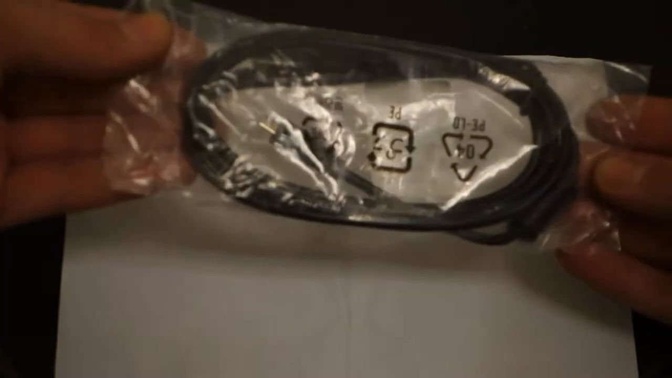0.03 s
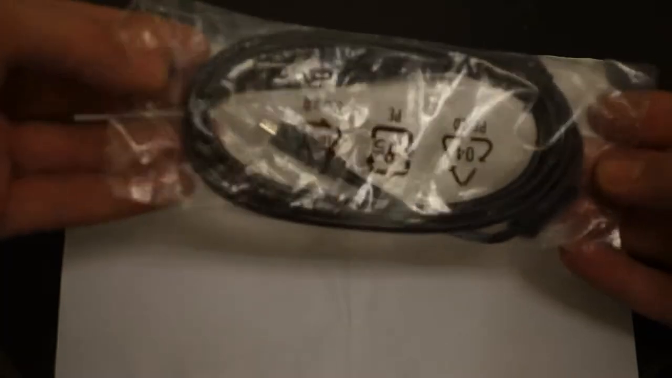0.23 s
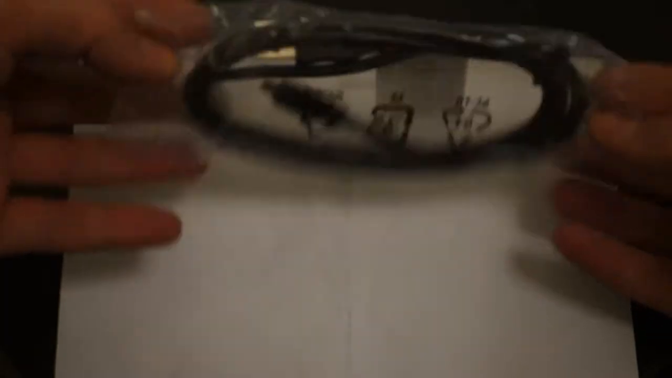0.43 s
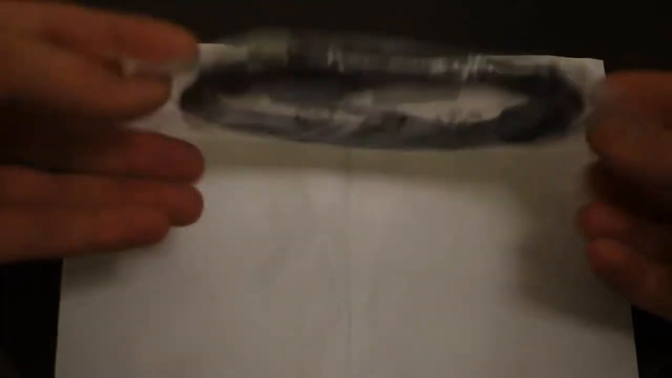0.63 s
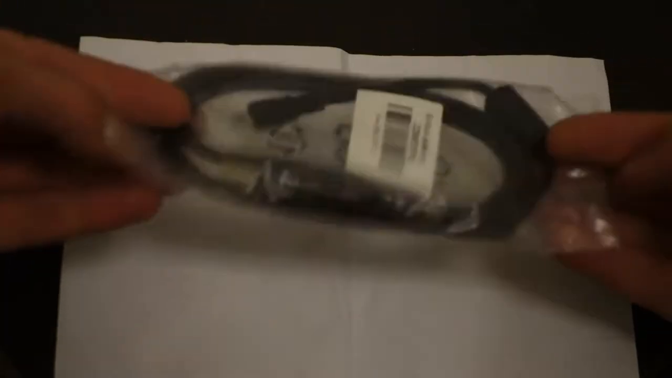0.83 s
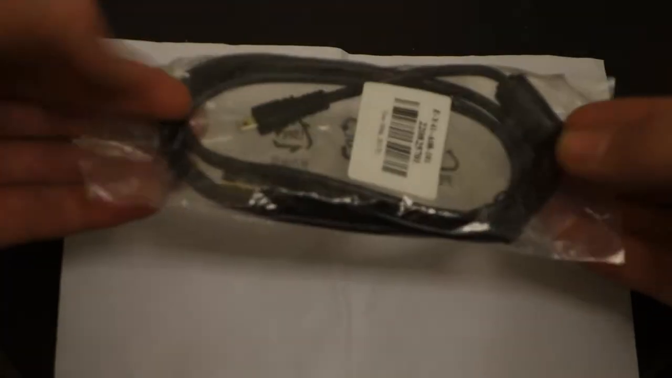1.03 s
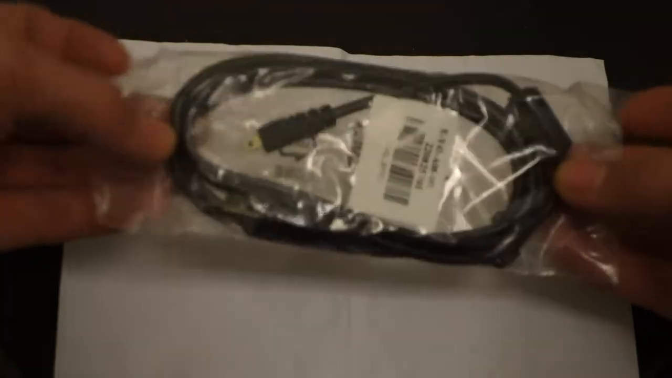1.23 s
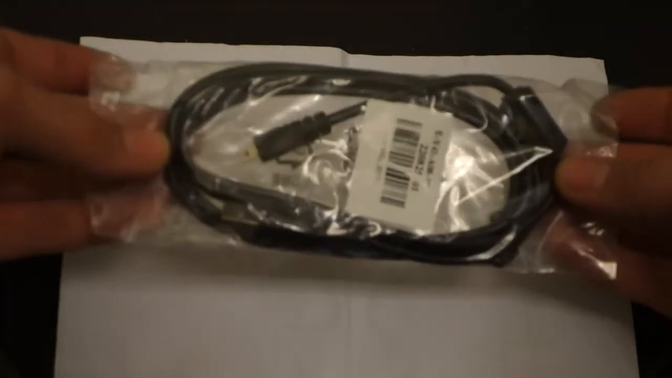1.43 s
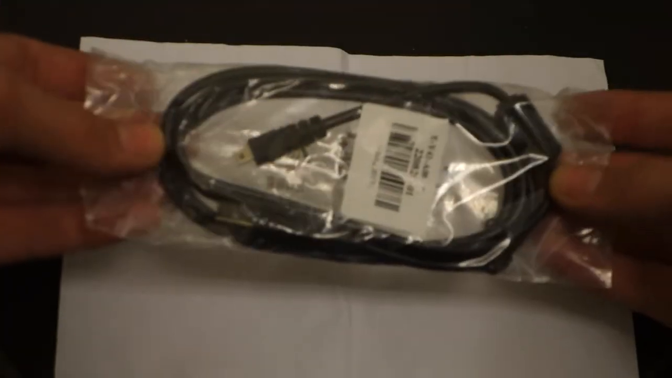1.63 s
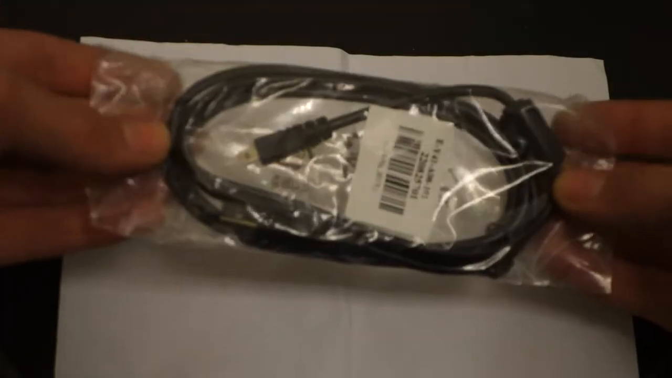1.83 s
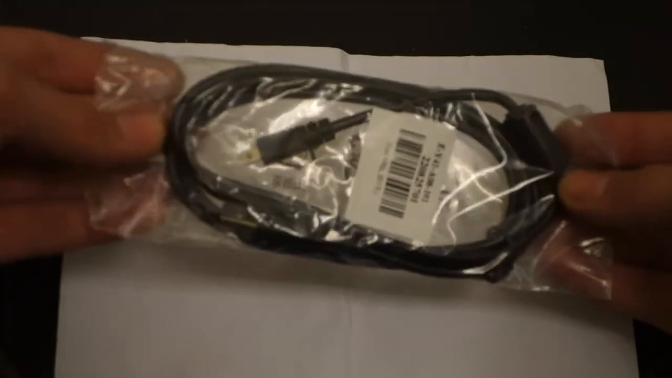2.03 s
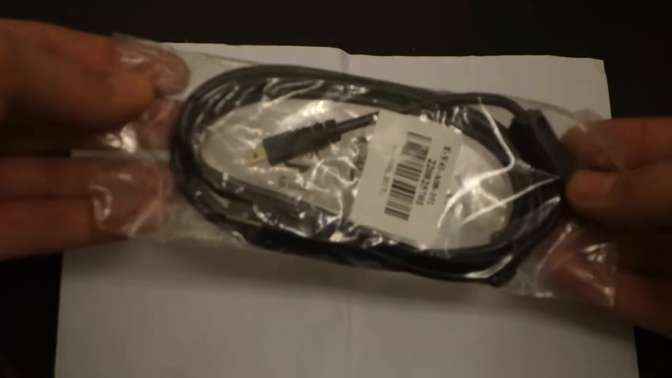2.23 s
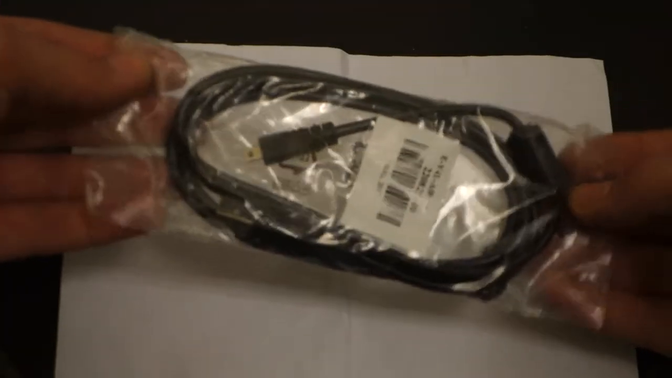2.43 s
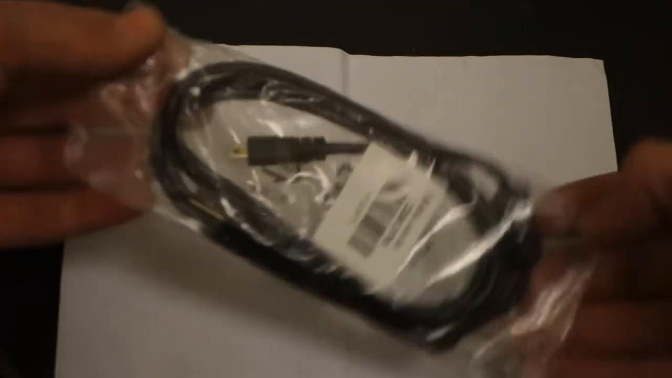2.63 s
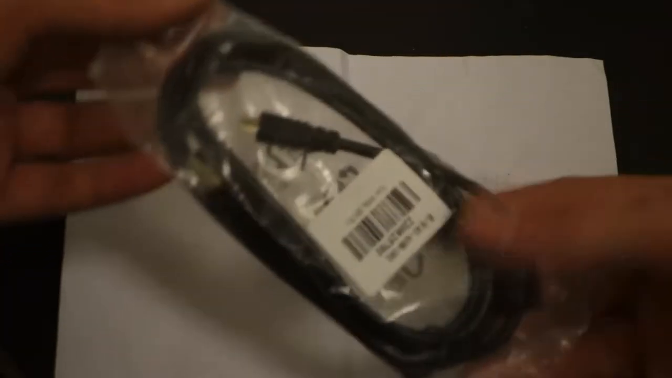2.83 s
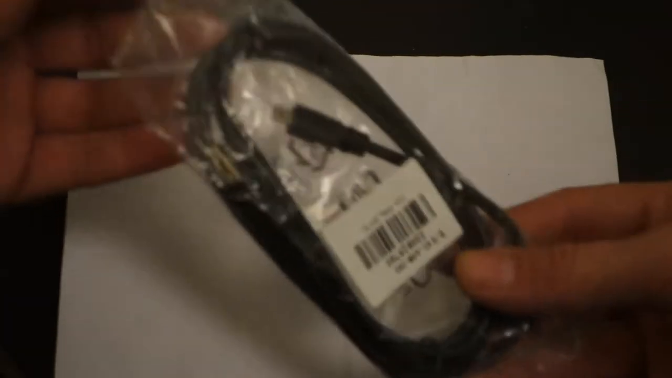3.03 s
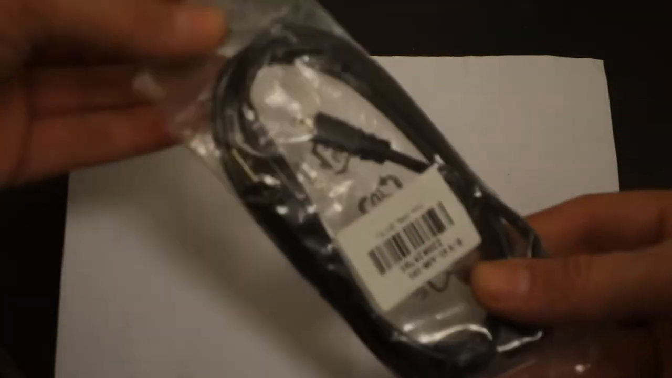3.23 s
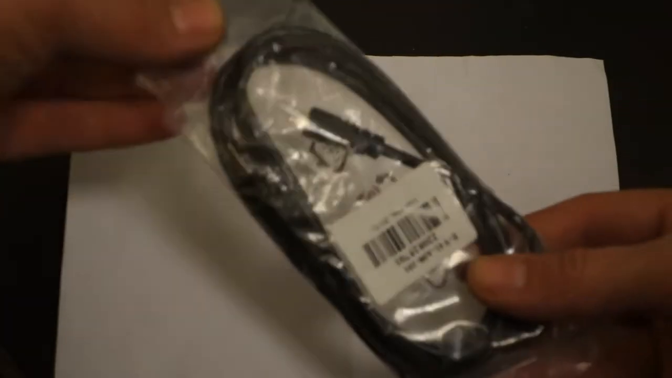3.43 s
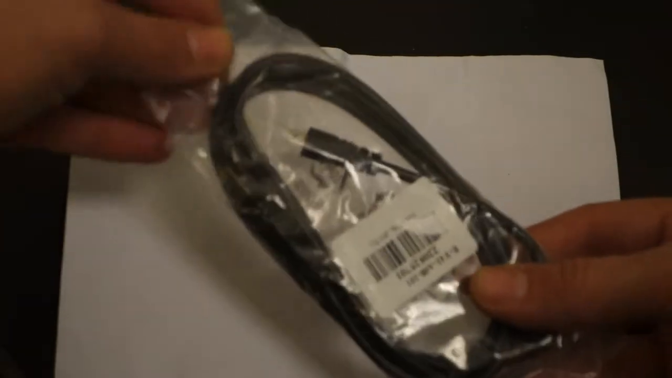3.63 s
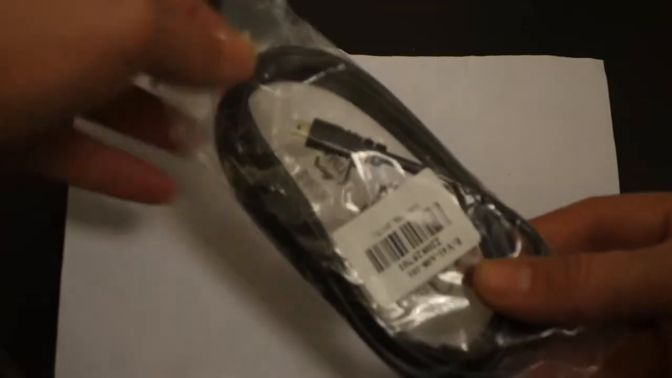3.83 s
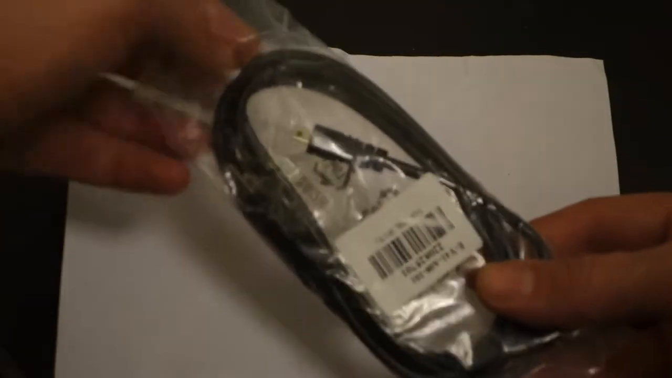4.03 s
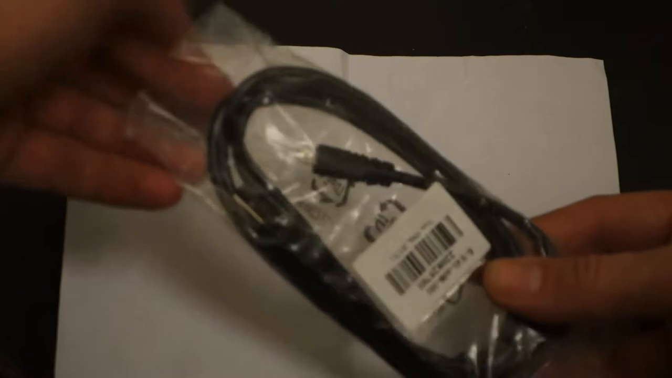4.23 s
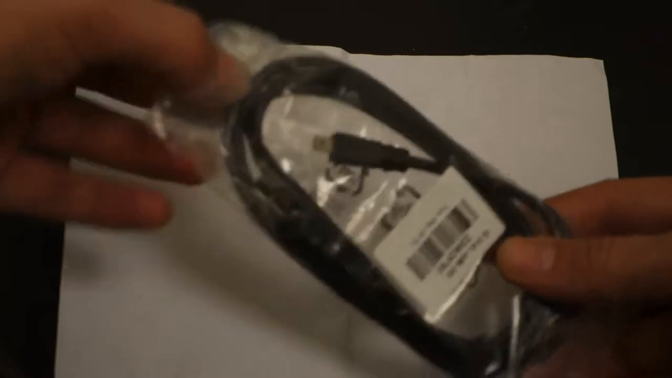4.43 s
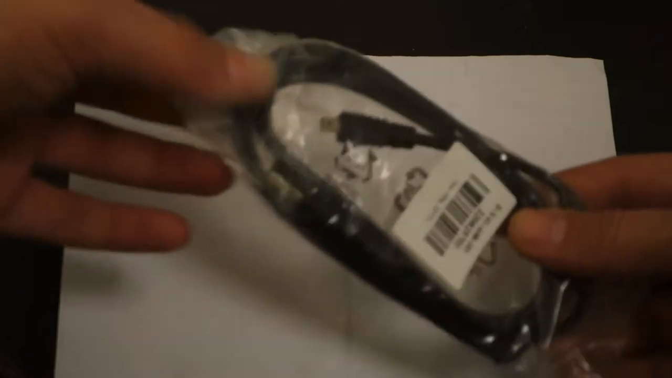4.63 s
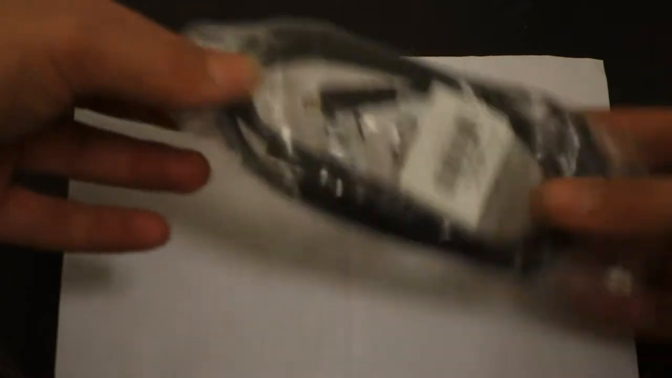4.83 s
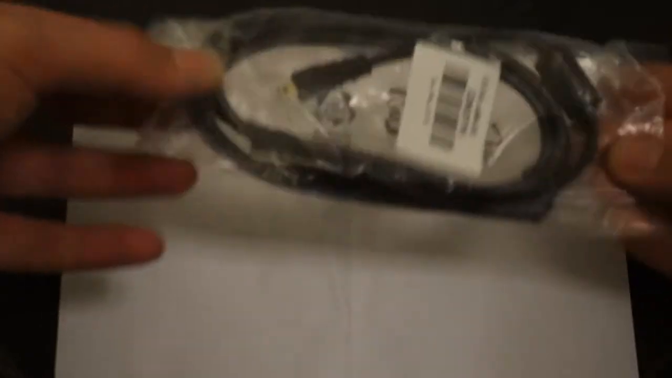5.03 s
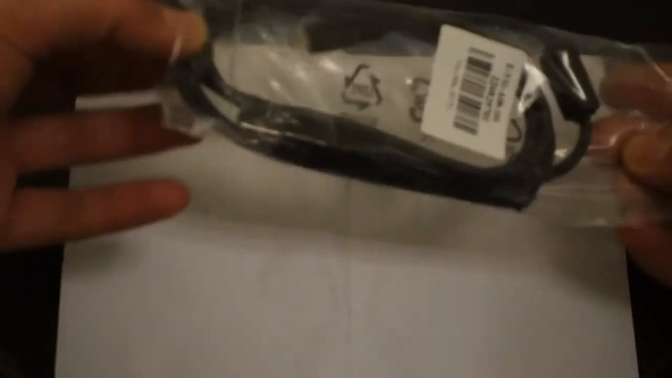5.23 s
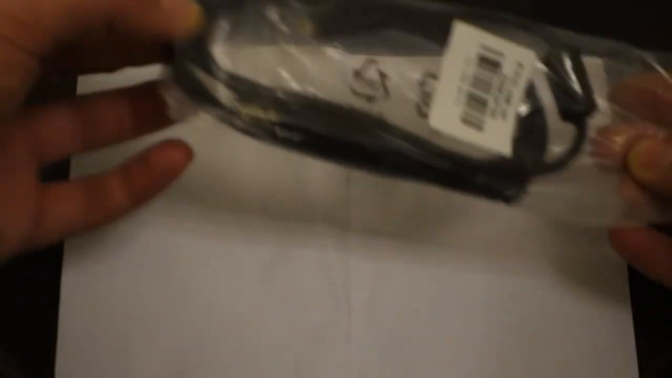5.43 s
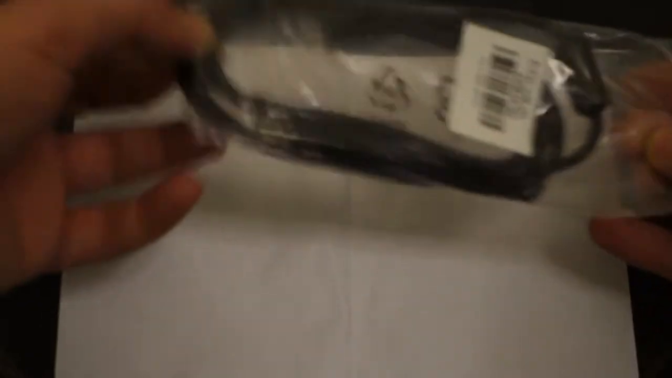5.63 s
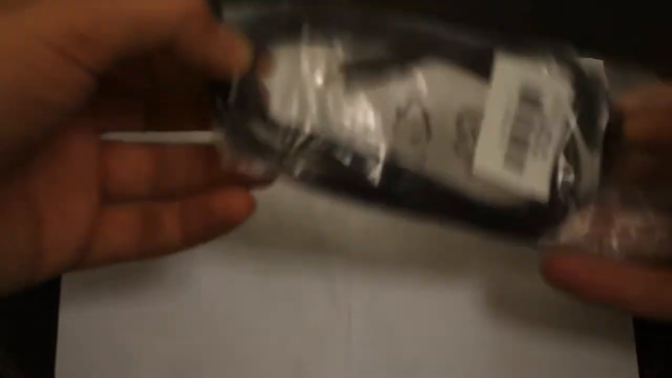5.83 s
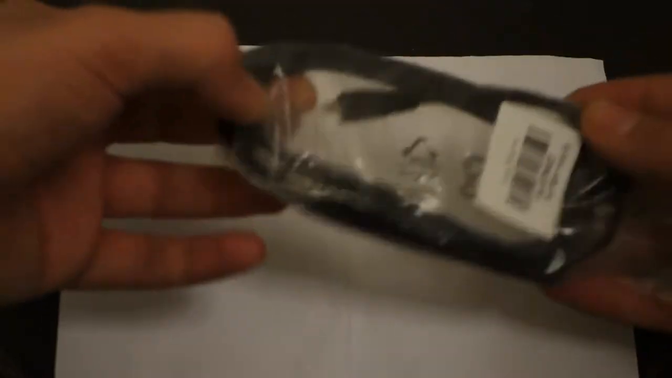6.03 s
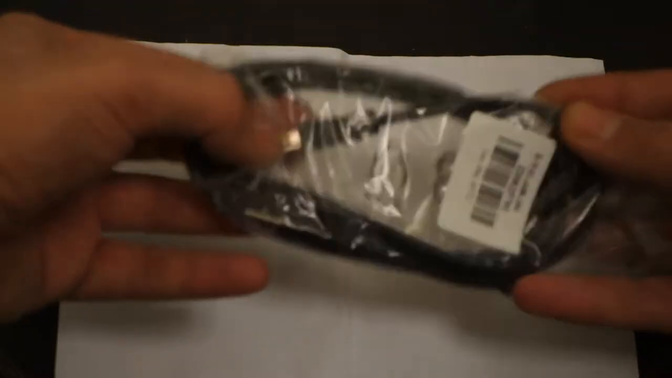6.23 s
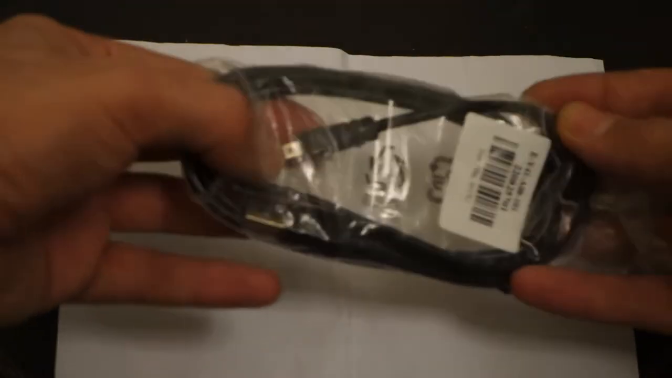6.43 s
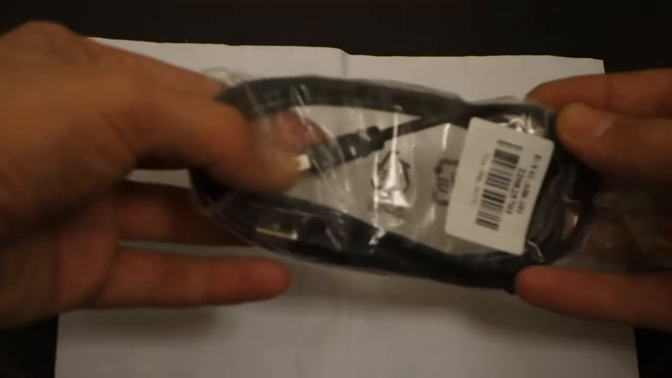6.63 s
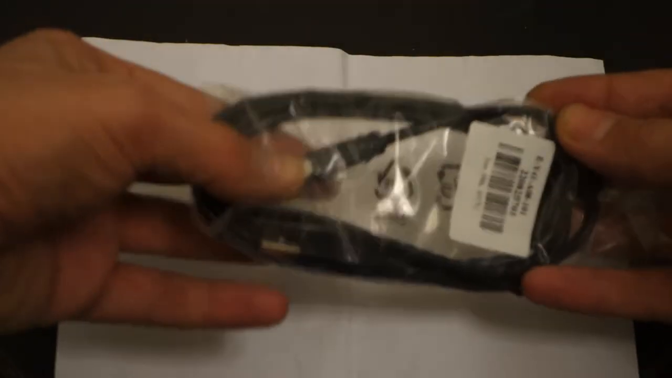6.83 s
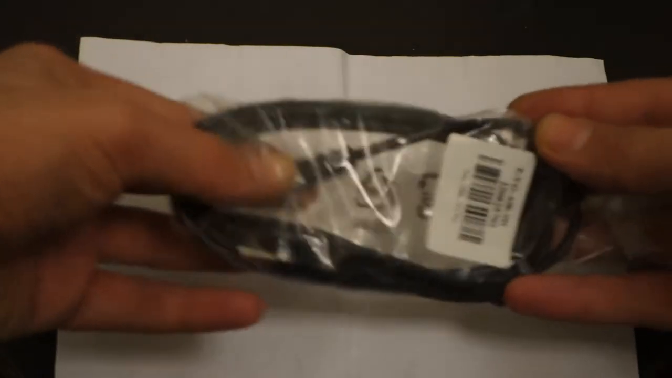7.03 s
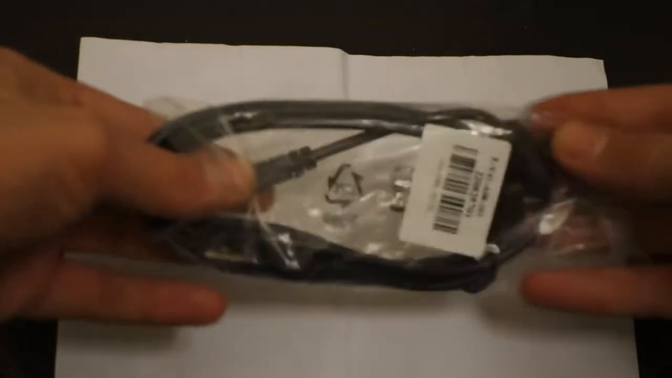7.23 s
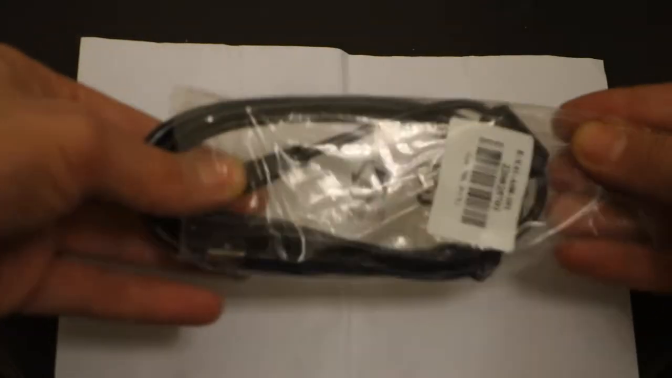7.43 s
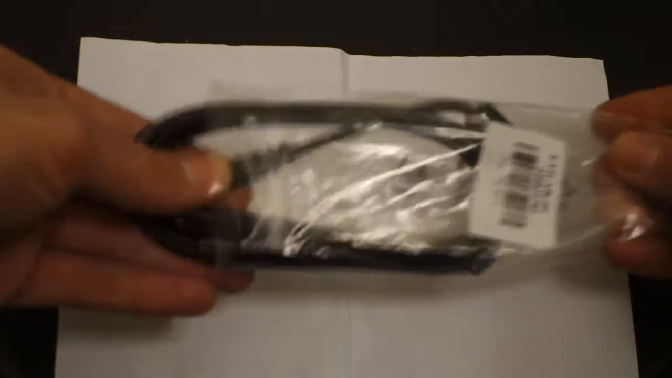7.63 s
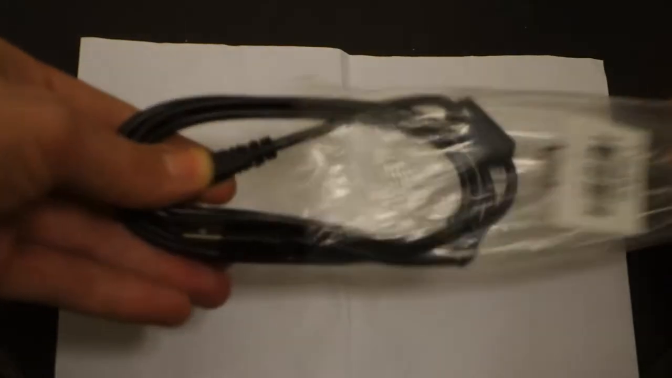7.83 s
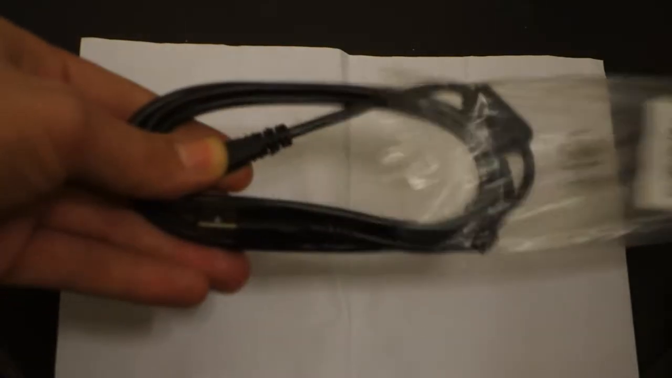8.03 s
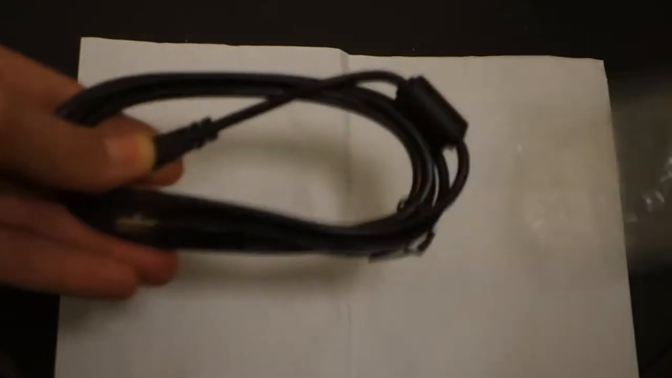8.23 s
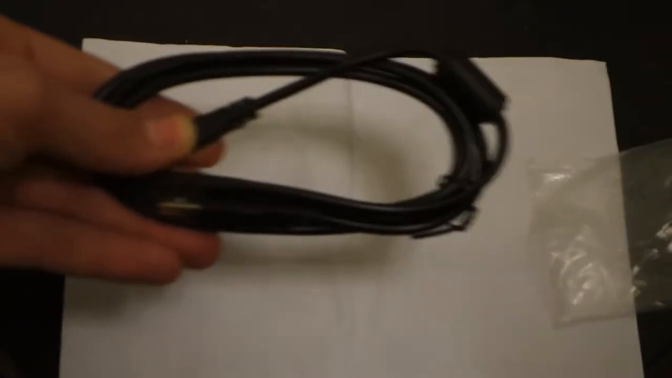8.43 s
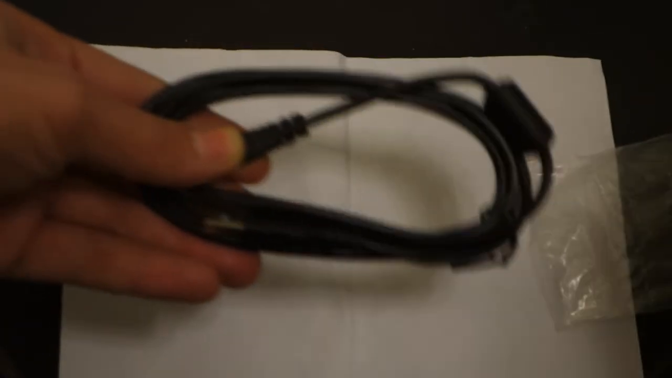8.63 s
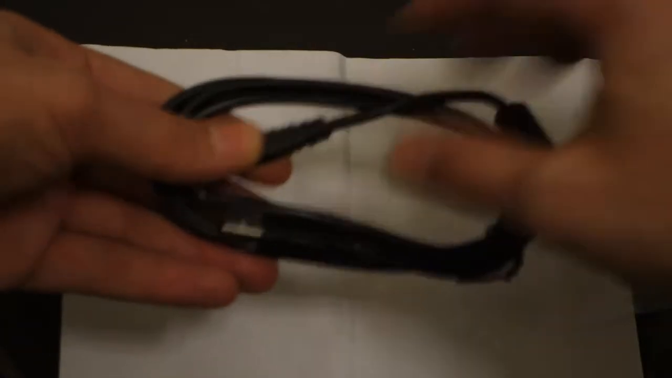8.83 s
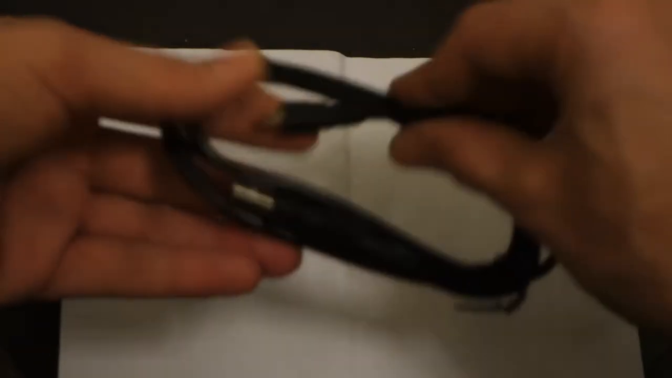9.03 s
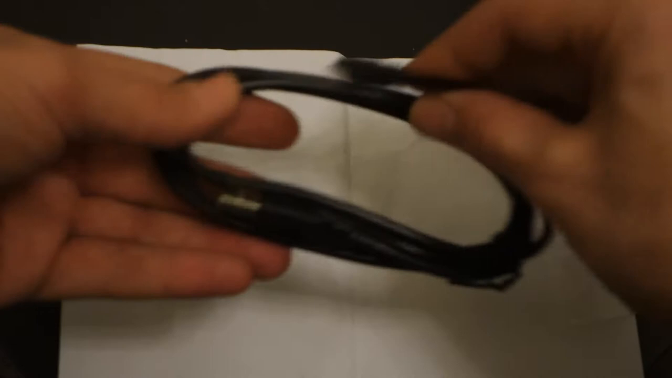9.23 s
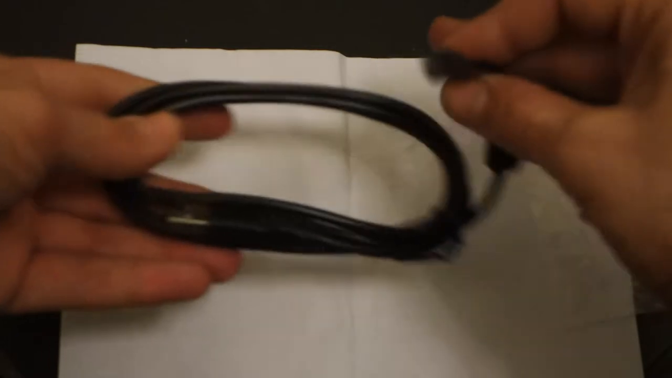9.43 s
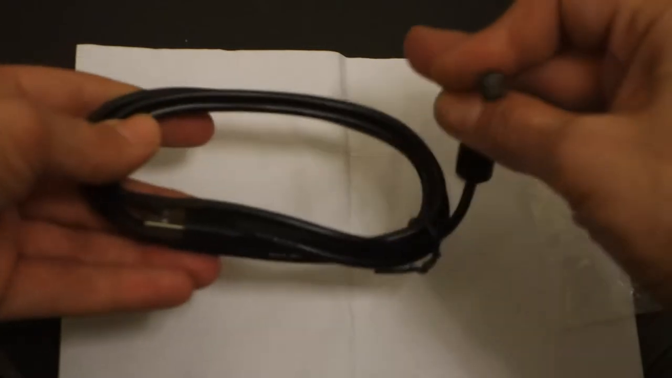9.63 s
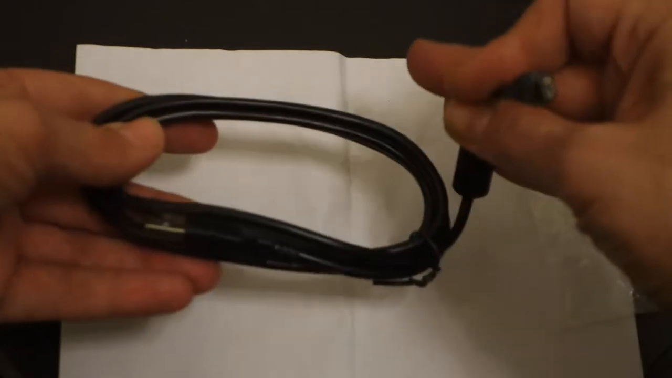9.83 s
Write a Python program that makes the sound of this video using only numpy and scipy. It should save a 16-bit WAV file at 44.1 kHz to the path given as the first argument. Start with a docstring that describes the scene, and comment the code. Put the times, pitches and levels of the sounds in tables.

```python
"""In a small room, hands turn a thin plastic bag close to a stereo microphone, open it and pull a cable out.
Single creases snap as sharp steps with a shiver, over a crackle of many small ones and hissing strokes of film.
Decaying noise tails make the room's echo of the bag. The cable rubs as a low, fuzzy tone and
squeaks as short gliding tones. Shaped noise makes a quiet hush; a very narrow noise makes a faint whine."""
import sys
import numpy as np
from scipy import signal
from scipy.fft import rfft, irfft
from scipy.io import wavfile
from scipy.ndimage import uniform_filter1d

SR = 44100
rng = np.random.default_rng(int(sys.argv[2]) if len(sys.argv) > 2 else 0)


def wav_record(signal):
    """Record a signal, one row per channel, as 16-bit PCM in the file named by sys.argv[1]."""
    frames = np.transpose(np.atleast_2d(signal))
    bounded = np.clip(frames, -1, 1)
    # unit amplitude maps onto the largest positive 16-bit level
    quanta = np.round(bounded * 32767).astype(np.int16)
    wavfile.write(sys.argv[1], SR, quanta)


def volts_from_db(level):
    """Convert decibel levels to linear amplitude ratios."""
    exponent = np.asarray(level, float) / 20
    return 10 ** exponent


N = 436590  # length of the scene in samples

SIZE = 2048  # samples in the sound of one crease
HZ = np.fft.rfftfreq(SIZE, 1 / SR)
LEAD = 128  # samples of soft lead-in before the step
HELD_HZ = 5000  # centre of the crackle while the bag is merely held

# creases that snap: (step_s, crack_peak_db, crack_centre_hz, thud_peak_db, left_over_right_db)
SNAPS = [(0.023, -47, 2690, -69, -1.0), (0.1339, -41, 9900, -74, -2.0), (0.2537, -26, 10000, -58, 0.0),
         (0.2648, -26, 5610, -46, -1.0), (0.2738, -22.5, 5740, -59, -2), (0.288, -24, 5800, -61, -2.5),
         (0.31, -20.5, 4710, -64, -3), (0.343, -17.5, 5090, -54, -1), (0.3607, -19, 3640, -51, -2.5),
         (0.4031, -30.5, 4220, -50, -4), (0.4664, -36, 4890, -64, -1.5), (0.5229, -37, 3100, -59, -6),
         (0.5618, -30.5, 2990, -53, -3), (0.5734, -29.5, 4550, -47, 0), (0.5932, -29, 5750, -47, -9),
         (0.6797, -34.5, 6520, -46, -7), (0.6867, -22, 6140, -44, -0.5), (0.7138, -19, 6600, -59.5, -3),
         (0.7637, -16, 4570, -47, -2.5), (0.7682, -8.5, 9400, -41, 3), (0.816, -20, 5080, -53, -1.5),
         (0.8238, -18, 5700, -36, -0.5), (0.857, -17, 5700, -32, -3), (0.8815, -14, 10200, -40, -3.0),
         (0.8948, -19.5, 2970, -39, -2.5), (0.9404, -43, 4140, -56, -0.5), (0.9798, -23.5, 3700, -54, -3),
         (1.0023, -22, 8340, -50, -0.5), (1.045, -22.5, 10200, -64, -0.5), (1.0802, -18, 5240, -55, 1),
         (1.2201, -16.5, 5060, -51, 0), (1.271, -30, 7370, -44, 0.0), (1.335, -24.5, 10250, -63, -2),
         (1.3554, -27.5, 4700, -58, 0), (1.4092, -34.5, 9660, -43, -1.0), (1.4961, -27, 3500, -40.5, -1),
         (1.7515, -32, 4950, -48, -5), (1.767, -30, 8400, -43.5, -5), (1.8713, -23.5, 4700, -30.5, -3.5),
         (1.8986, -30, 4830, -36, -3.0), (1.9685, -26, 2330, -36.5, -1), (2.1387, -18.5, 5900, -42.5, -2.5),
         (2.2346, -19.5, 7800, -54, -1), (2.2656, -30, 4520, -49, -2.5), (2.282, -31, 6250, -43, -2.0),
         (2.2937, -35, 5670, -43, -1.5), (2.308, -32, 6300, -59, -4), (2.331, -31.5, 6400, -59, 2),
         (2.4157, -26.5, 5800, -39.5, -6), (2.4884, -24, 6900, -61, -1), (2.5239, -29, 5560, -41, 0),
         (2.548, -31, 5980, -49, -0.5), (2.58, -22, 7740, -32.5, 2), (2.584, -21, 5780, -41, 0),
         (2.6364, -30, 6700, -54, -3), (2.6612, -18, 5870, -49, 0.0), (2.6736, -20, 7600, -45, 0.0),
         (2.699, -24, 8150, -60, 1.0), (2.7822, -28, 5670, -41, -4), (2.8865, -18, 4140, -39, -4),
         (2.9192, -30, 3860, -47, 2), (2.9692, -27, 6520, -36.5, 3), (2.9987, -30, 4610, -43, 2),
         (3.0354, -22, 4440, -47, -3), (3.0676, -20.5, 5200, -37, -2), (3.1366, -25.5, 6000, -43, -1),
         (3.3, -29, 5360, -37, 0), (3.3484, -17.5, 6050, -59, -2), (3.4194, -25, 7250, -60, 0),
         (3.4643, -22, 6650, -55, -0.5), (3.4825, -22, 2870, -48, 0.0), (3.4999, -27, 3000, -57, 4),
         (3.5853, -27.5, 2710, -61, 2), (3.6724, -18, 3050, -44, -1), (3.707, -21, 2940, -55, -0.5),
         (3.7152, -11, 5640, -58, -2.5), (3.749, -24, 4130, -60, -1.0), (3.8053, -15.5, 7660, -28.5, -3),
         (3.848, -17, 5750, -42, -0.5), (3.8836, -27.5, 9200, -53, 0.0), (3.931, -16, 4940, -29, -2),
         (3.9869, -15, 5330, -35, -1.0), (4.0514, -21.5, 8560, -30.5, 0), (4.077, -31, 2850, -44, -1.0),
         (4.1198, -20, 5040, -50, -1.5), (4.129, -18.5, 8300, -32.5, -3), (4.2009, -26, 4100, -36, 1),
         (4.2179, -17.5, 3610, -26, -1), (4.2304, -18, 4280, -39, 2), (4.238, -11, 3040, -40, -1),
         (4.25, -13, 9000, -41, 0.0), (4.2669, -11, 9300, -39, -1.5), (4.3068, -11.5, 8050, -49, -0.5),
         (4.385, -26.5, 2200, -56, 1), (4.5798, -21, 8750, -46, -1), (4.6303, -29.5, 6150, -53.5, 0.5),
         (4.6568, -15, 8300, -52, 0), (4.6617, -20.5, 3750, -40, -3), (4.6918, -22.5, 8140, -36, 2),
         (4.7259, -28.5, 2940, -43, -1.5), (4.7706, -17.5, 6900, -28.5, -1), (4.7872, -24, 5540, -40, -6),
         (4.8291, -20, 4600, -57, -2), (4.8882, -22, 4300, -37, -1.5), (4.9123, -27, 4250, -39, -1.5),
         (4.9488, -16.5, 5400, -26, -2), (5.0145, -32.5, 9200, -51, -6), (5.041, -18.5, 3800, -32, -1),
         (5.1221, -18.5, 3660, -48.5, -1), (5.1529, -14.5, 6930, -36, -2), (5.1647, -14.5, 6640, -43, -2.0),
         (5.1743, -11.5, 6800, -44.5, -2.5), (5.291, -15, 6230, -29, -2.0), (5.3601, -26.5, 7000, -39, -3),
         (5.3753, -32.5, 7500, -33.5, 2), (5.3967, -27, 4200, -41, -2.0), (5.4488, -26, 10400, -40, -6),
         (5.457, -24, 4960, -35.5, -0.5), (5.4674, -18.5, 7750, -46, -2), (5.477, -14, 7700, -29.5, 1),
         (5.6801, -19.5, 3960, -48, -8), (5.6895, -21, 4690, -48.5, -1), (5.7332, -12, 7600, -39, -3.0),
         (5.7373, -12.5, 7160, -22, -1.5), (5.7704, -22, 2850, -34, 0), (5.7878, -13, 5570, -30.5, -6.5),
         (5.8207, -9.5, 8710, -23, 1), (5.834, -15.5, 8650, -33, -6), (5.9777, -21, 3840, -38, -5),
         (6.0238, -20, 5700, -33, -10), (6.0557, -16, 4110, -26.5, -2.5), (6.0939, -12, 7900, -45, 0),
         (6.1205, -17, 5350, -42.5, -0.5), (6.1348, -14.5, 6800, -30.5, 5), (6.1524, -11, 2340, -40, -0.5),
         (6.186, -11.5, 4070, -27.5, -2.5), (6.2289, -32, 3270, -55, 0), (6.2445, -21, 8200, -46, -4),
         (6.2562, -29, 5290, -31, -1.0), (6.3036, -17, 6360, -43, -1.0), (6.3259, -19, 4270, -26.5, -1),
         (6.3765, -20, 5350, -36, -2), (6.382, -28, 5780, -38, -3), (6.4046, -20.5, 5180, -40, 0),
         (6.4847, -25.5, 3570, -34, 2), (6.5214, -22, 2700, -37, -1.0), (6.6356, -25, 2910, -46, 5),
         (6.6476, -14, 2830, -32.5, -3), (6.6553, -19.5, 3090, -41, 0), (6.8254, -30, 3330, -44, -4),
         (6.836, -26, 2530, -38, 0), (6.8565, -20.5, 2700, -35, -2), (6.8738, -17.5, 3450, -36, -1.0),
         (6.949, -25.5, 3340, -44, -1), (6.993, -26.5, 2440, -35, -1.0), (7.0678, -29, 9200, -45, -1.5),
         (7.168, -27, 2580, -41, -4), (7.1837, -16.5, 3240, -36, -2.5), (7.21, -24, 3620, -38, -2.5),
         (7.2617, -24, 3270, -32, -4), (7.2875, -14, 2500, -27.5, -3), (7.338, -21, 4240, -35.5, -3.0),
         (7.354, -16, 8400, -39, -5), (7.359, -12.5, 3300, -31, -1), (7.3774, -15, 9360, -48, -5),
         (7.447, -20, 2540, -37, -1.0), (7.475, -15, 6350, -38, -1.0), (7.5126, -20, 5640, -30, 3),
         (7.5541, -11.5, 9500, -33, -3), (7.563, -16, 3170, -42, 0.5), (7.657, -21.5, 3280, -47, -1.0),
         (7.679, -26.5, 5630, -42, -1.5), (7.7215, -13, 3430, -29, -1.5), (7.9574, -19, 4310, -51.5, -2.5),
         (8.0138, -12.5, 4300, -41.5, -3), (8.0314, -14, 7390, -52.5, -8), (8.0815, -9.5, 6400, -31, -1.0),
         (8.0892, -16.5, 8620, -34, -4), (8.1688, -24.5, 8100, -53, -11), (8.2642, -18.5, 7100, -38, -7),
         (8.3536, -23, 4900, -39.5, -6), (8.3801, -22, 6590, -36, -4), (8.4822, -34, 5490, -41, -9),
         (8.508, -35, 5250, -46, -3.0), (8.7181, -46.5, 3880, -55, -4), (8.8826, -39, 4970, -73, -4.5),
         (8.8954, -44, 5580, -69, 1.5), (8.9204, -44.5, 2710, -68, -1.0)]
# colour of the film over the table: (pitch_hz, level_db per Hz)
FILM = [(24, -66), (40, -45.5), (249, -48), (397, -20), (447, -24), (551, -14.5), (681, -14), (881, -5),
        (1090, -6), (1470, 0.5), (2050, -2.5), (2590, 1.5), (5480, 2), (10800, 4), (14000, -33),
        (22000, -120)]


def evened(x):
    """Scales a signal to an rms of one."""
    return x / np.sqrt(np.mean(x ** 2) + 1e-20)


def read(points, hz):
    """Reads a curve of (pitch_hz, value) between its points, along a logarithmic pitch scale."""
    f, value = np.transpose(points)
    return np.interp(np.log(hz + 1), np.log(f + 1), value)


def causal(db):
    """Minimum-phase spectrum for each row of gains in dB: all the sound comes after its cause."""
    cepstrum = irfft(np.maximum(db, -100) * np.log(10) / 20)
    cepstrum[..., 1:SIZE // 2] *= 2
    cepstrum[..., SIZE // 2 + 1:] = 0
    return np.exp(rfft(cepstrum))


def pair(same, frames):
    """Two random short-time spectra that agree by a share that depends on frequency."""
    a, b, c, d = rng.standard_normal((frames, len(same), 4)).T
    same = np.clip(same, -1, 1)[:, None]
    left = a + 1j * b
    right = same * left + np.sqrt(1 - same ** 2) * (c + 1j * d)
    return np.array([left, right])


def sides(pan_db):
    """Left and right gains for a level difference between the sides."""
    return volts_from_db(np.array([pan_db / 2, -pan_db / 2]))


def bell(hz, centre_hz, octaves):
    """A smooth hump of height one around a centre pitch."""
    return np.exp(-.5 * (np.log2((hz + 1) / centre_hz) / octaves) ** 2)


def buckles(centre_hz, shiver_s=0.021, split_hz=2200, hump_db=15, octaves=0.61, echo_db=-6):
    """A crease jumps in one step, the film shivers and the table throws the step back.
    A short soft noise rises before each step. Returns the crack (above split_hz) and the thud (below)."""
    # left-right likeness of the shiver and the lead-in: (pitch_hz, likeness)
    shiver_same = [(600, .97), (2000, .85), (5000, .5), (10000, .1)]
    t = (np.arange(SIZE) - LEAD) / SR
    common, left, right, chance = np.moveaxis(rng.standard_normal((len(centre_hz), 4, SIZE)), 1, 0)

    lead_in_db = -26 + 60 * t / .008
    fade_s = shiver_s * np.exp(.3 * chance[:, :1])  # time to fall by 60 dB, differs by crease
    shiver_db = -14 - 60 * t / fade_s
    swing = volts_from_db(np.where(t < 0, lead_in_db, shiver_db))
    alike = np.clip(read(shiver_same, HZ), 0, 1)
    own = np.sqrt(1 - alike ** 2) * rfft(swing * np.array([left, right]))
    shake = alike * rfft(swing * common) + own

    side_s = .00003 * np.array([chance[:, 3:4], chance[:, 4:5]])
    table_s = .002 + 0.000278 * chance[:, 2:3] + side_s  # extra delay by way of the table
    echo = volts_from_db(echo_db) * np.exp(-2j * np.pi * HZ * table_s)
    step = np.exp(-2j * np.pi * HZ * LEAD / SR) * (1 + echo)

    film_db = read(FILM, np.minimum(HZ, 10500))
    hump = hump_db * bell(HZ, centre_hz[:, None], octaves)
    # some creases thud lower than others, as large panels do
    tilt = 4 * np.tanh(chance[:, 1:2]) * np.log2(np.clip(HZ, 500, 3000) / 1000)
    low_db = -10 * np.log10(1 + (HZ / split_hz) ** 6)
    high_db = -10 * np.log10(1 + (split_hz / (HZ + 1)) ** 6)
    return [irfft((step + shake) * causal(film_db + db)) for db in (high_db + hump, low_db + tilt)]


def snaps():
    """The creases loud enough to be heard singly, each a crack and a thud."""
    step_s, crack_db, centre_hz, thud_db, pan_db = np.transpose(SNAPS)
    cracks, thuds = [p / abs(p.mean(0)).max(1)[:, None] for p in buckles(centre_hz)]
    sound = cracks * volts_from_db(crack_db)[:, None] + thuds * volts_from_db(thud_db)[:, None]
    sound = sound * sides(pan_db)[..., None]
    sound *= signal.windows.tukey(SIZE, .05)
    out = np.zeros((2, N + SIZE))
    for k, at in enumerate(np.round(step_s * SR).astype(int) - LEAD):
        out[:, at:at + SIZE] += sound[:, k]
    return out[:, :N]


def effort():
    """Crackle level and centre over time: holding, crumples and the wake of each snap add their power."""
    # the bag merely held and turned: (time_s, fine_crackle_db)
    handling = [(0, -95), (.19, -62), (.45, -61.5), (.65, -67), (.95, -53), (1.35, -50.5), (1.7, -72),
                (1.77, -56), (1.85, -64), (1.89, -52), (2.04, -66), (2.15, -53.5), (2.38, -57.5),
                (2.47, -52), (3.08, -53.5), (3.33, -58), (3.65, -56.5), (3.86, -45.5), (4.03, -50.5),
                (4.53, -56.5), (4.8, -46), (5.6, -57), (6.6, -60.5), (6.8, -62), (6.99, -46), (7.12, -58.5),
                (7.65, -39), (8.0, -40.5), (8.2, -50), (8.5, -57.5), (8.57, -84.5), (8.8, -96.5)]
    # fingers crumple a fold, one burst each: (peak_s, peak_db, swell_s, fade_s, centre_hz)
    crumple_table = [(0.248, -49.5, 0.11, 0.25, 7800), (0.357, -35.5, 0.083, .07, 5170),
                     (.587, -52, 0.088, 0.055, 4700), (.692, -31.5, 0.045, 0.065, 5360),
                     (0.781, -37, 0.063, 0.24, 5350), (0.86, -33.5, .3, 0.1, 5194),
                     (1.008, -45.5, 0.2, 0.48, 4830), (1.228, -45, 1, 0.058, 5000),
                     (2.592, -42.5, 0.022, 0.087, 5720), (2.665, -35, 0.028, 0.04, 5920),
                     (2.893, -41.5, 0.083, 0.3, 4875), (3.357, -46, 0.022, 0.036, 5650),
                     (3.51, -43, 0.096, 0.076, 4520), (3.722, -43.5, 0.073, 0.71, 5340),
                     (4.135, -43, 0.15, 0.075, 6060), (4.261, -32, 0.09, 0.12, 4210),
                     (4.401, -49, 0.077, 0.19, 3620), (4.665, -37.5, .07, 0.045, 5100),
                     (4.958, -38, 0.2, 0.053, 4490), (5.051, -40, 0.034, 0.12, 4680),
                     (5.166, -23.5, 0.064, 0.044, 5656), (5.294, -39, 0.1, 0.1, 5040),
                     (5.473, -39, 0.08, 0.05, 5330), (5.669, -35, 0.046, 0.12, 4590),
                     (5.74, -38, 0.027, 0.84, 5550), (5.981, -28, 0.085, 0.12, 5520),
                     (6.161, -35, 0.6, 0.18, 4424), (6.288, -34.5, 0.15, 0.072, 5220),
                     (6.394, -42.5, 0.1, 0.062, 4800), (6.502, -46.5, 0.11, 0.13, 3980),
                     (6.679, -43.5, 0.088, 0.12, 3830), (6.882, -40.5, 0.058, 0.06, 4340),
                     (7.2, -28.5, 0.055, .24, 4546), (7.368, -27, 0.049, 0.072, 5210),
                     (7.562, -33, 0.22, 0.12, 5120), (7.79, -40.5, 0.22, .3, 6460),
                     (8.085, -24.5, 0.13, 0.062, 6076), (8.298, -35.5, 0.2, 0.053, 5650),
                     (8.427, -41.5, 0.33, 0.13, 5680), (8.5, -46, .1, 0.065, 5350)]
    swell_db = 20  # gained in the swell time and lost in the fade time
    after_db, after_t60_s = -31.5, .15  # neighbours set off by a snap: level below its crack peak, fading

    t = np.arange(0, N / SR, .002)
    peak_s, db, swell_s, fade_s, crumple_hz = np.transpose(crumple_table)[..., None]
    distance = np.where(t < peak_s, (peak_s - t) / swell_s, (t - peak_s) / fade_s)
    crumples = volts_from_db(2 * (db - swell_db * distance))  # amp of twice the dB gives power
    step_s, crack_db, snap_hz = np.transpose(SNAPS)[:3, :, None]
    wakes = volts_from_db(2 * (crack_db + after_db - 60 * abs(t - step_s) / after_t60_s)) * (t > step_s)
    held = volts_from_db(2 * np.interp(t, *np.transpose(handling)))

    power = held + crumples.sum(0) + wakes.sum(0)
    weighted_hz = held * HELD_HZ + (crumples * crumple_hz).sum(0) + (wakes * snap_hz).sum(0)
    curves = (10 * np.log10(power), weighted_hz / power)
    return [np.interp(np.arange(N) / SR, t, c) for c in curves]


def crackle(per_s=1500, denser=0.32, spread_db=5.5, smoother=0.022, clump_db=2, scatter_octaves=.5,
            pan_db=-1.0, sway_db=2, count=24):
    """Many small creases give way in clumps while the fingers press and slide.
    Harder handling packs them closer and evens their sizes; per_s is their rate at a crackle of -50 dB."""
    crackle_db, centre_hz = effort()
    # a low rustle goes with the crackle: it grows with it, and as the crackle sinks in pitch
    rustle_db = -57.5 + 0.96 * (crackle_db + 50) + 8.5 * np.log2(HELD_HZ / centre_hz)
    kinds_hz = np.geomspace(2400, 10400, count)
    cracks, thuds = buckles(kinds_hz, shiver_s=0.025)
    place = sides(pan_db + sway_db * rng.standard_normal(count))

    clumps, octaves = rng.standard_normal((2, N))
    clumps = evened(uniform_filter1d(uniform_filter1d(clumps, 400), 400))
    octaves = octaves + .5 * evened(uniform_filter1d(octaves, 700))  # neighbouring creases sound alike
    kind = np.searchsorted(kinds_hz, centre_hz * 2 ** (scatter_octaves * octaves))
    kind = np.clip(kind, 0, count - 1)

    fires, size = rng.random((2, N))
    odds = np.clip(per_s * volts_from_db(denser * (crackle_db + 50)) / SR, .005, .3)  # chance in each sample
    spread = spread_db - smoother * (crackle_db + 53)
    size = evened(volts_from_db(clump_db * clumps - spread * np.log(size + 0.014)))
    size = size * (fires < odds) / np.sqrt(odds)  # closer creases are smaller, so the level holds

    out, fade = 0, signal.windows.tukey(1024, .1)
    for shapes, db in ((cracks, crackle_db), (thuds, rustle_db)):
        shapes = place[..., None] * shapes / np.linalg.norm(shapes, axis=2, keepdims=True)
        for k in range(count):
            train = size * volts_from_db(db) * (kind == k)
            out = out + signal.oaconvolve(train[None], shapes[:, k, :1024] * fade, axes=1)[:, :N]
    return out


def slides(soft=0.36, hump_db=8, octaves=.7, alike=0.56):
    """Film drawn smoothly over the cable or a finger: an even hiss that swells and stops with each stroke."""
    # strokes: (start_s, length_s, level_db, centre_hz)
    strokes = [(4.299, .035, -34, 8000), (5.042, 0.057, -36, 4430), (5.633, 0.044, -45.5, 4000),
               (5.961, 0.051, -33.5, 5000), (7.194, 0.029, -30.5, 4500), (7.723, 0.16, -33, 6500),
               (8.07, 0.039, -31.5, 6500)]
    out = np.zeros((2, N))
    for start_s, length_s, db, centre_hz in strokes:
        common, left, right = rng.standard_normal((SIZE * 4, 3)).T
        hz = np.fft.rfftfreq(len(common), 1 / SR)
        colour = read(FILM, np.minimum(hz, 10500)) + hump_db * bell(hz, centre_hz, octaves)
        noise = alike * common + (1 - alike) * np.array([left, right])
        hiss = evened(irfft(rfft(noise) * volts_from_db(colour)))
        at, n = round(start_s * SR), round(length_s * SR)
        out[:, at:at + n] += volts_from_db(db) * hiss[:, :n] * signal.windows.tukey(n, np.clip(soft, 0, 1))
    return out


def room(x, gap_s=0.0012):
    """Echo of a small room: three decaying noise tails take turns, so that the echo keeps changing."""
    # left-right likeness of the echoes: (pitch_hz, likeness)
    echo_same = [(100, .5), (600, .92), (1500, .85), (4000, .5), (10000, .15)]
    # time in which the echo falls by 60 dB: (pitch_hz, t60_s)
    echo_t60 = [(300, 0.084), (1300, 0.083), (3500, 0.11), (9000, 0.11)]
    hz, t = np.fft.rfftfreq(256, 1 / SR), np.arange(300) * 64 / SR
    out = 0
    for k in range(3):
        z = pair(read(echo_same, hz), 300) * volts_from_db(-60 * t / read(echo_t60, hz)[:, None])
        tail = signal.istft(z, nperseg=256, noverlap=192)[1]
        tail *= np.clip(np.arange(tail.shape[1]) / SR / gap_s, 0, 1) ** 2  # the echo starts softly
        turn = np.sqrt(2 / 3) * np.cos(np.pi * (7 * np.arange(N) / SR + k / 3))
        sent = (x.mean(0) * turn)[None]
        out = out + signal.fftconvolve(sent, tail / np.linalg.norm(tail[0]), axes=1)[:, :N]
    return out


def fuzzy_tone(hz, width_hz):
    """Noise in one narrow resonance, heard as a tone that wavers."""
    r = np.exp(-np.pi * width_hz / SR)
    noise = rng.standard_normal(N) + 1j * rng.standard_normal(N)
    wander = signal.lfilter([1], [1, -2 * r, r * r], noise)
    return evened((wander * np.exp(2j * np.pi * hz * np.arange(N) / SR)).real)


def rubbing(hz=392.4, width_hz=106, wobble_db=3.1):
    """Skin and cable sliding set the air over the table humming; stick and slip make the level waver."""
    # level around which the hum wavers: (time_s, level_db)
    rub_level = [(0, -88), (.72, -64.5), (1.02, -80), (1.68, -78), (1.75, -105), (2.98, -71.5), (3.2, -96),
                 (4.6, -92), (4.66, -68.5), (5.15, -67.5), (5.71, -79), (6.07, -64), (6.7, -82.5),
                 (7.28, -68), (8.122, -72), (8.16, -64), (8.5, -73.5), (8.58, -90.5), (9.52, -100),
                 (9.6, -77), (9.9, -91)]
    level = volts_from_db(np.interp(np.arange(N) / SR, *np.transpose(rub_level)))
    middle = fuzzy_tone(hz, width_hz)
    side = np.array([[.3], [-.3]]) * fuzzy_tone(hz, width_hz)
    slow = uniform_filter1d(uniform_filter1d(rng.standard_normal(N), 900), 900)
    return level * (middle + side) * volts_from_db(wobble_db * evened(slow))


def squeak():
    """The cable jacket catches and squeaks: short gliding tones that swell and fade."""
    # squeaks: (start_s, length_s, start_hz, end_hz, level_db)
    glides = [(6.572, 0.062, 1170, 1220, -62), (8.318, 0.088, 777, 725, -59),
              (9.746, 0.13, 718, 653, -74.5)]
    out = np.zeros(N)
    for start_s, length_s, start_hz, end_hz, db in glides:
        hz = np.linspace(start_hz, end_hz, round(length_s * SR))
        tone = np.sin(2 * np.pi * np.cumsum(hz) / SR) * signal.windows.tukey(len(hz), .6)
        out[round(start_s * SR):][:len(hz)] += np.sqrt(2) * volts_from_db(db) * tone
    return out


def hush(level_db=-68.5, patchy_db=1.5):
    """A shaped background noise with drifting patches of louder and softer sound."""
    # left-right likeness: (pitch_hz, likeness)
    hush_same = [(60, 0.9), (220, 0.51), (840, 0.21), (3120, -0.3), (11700, -0.12)]
    # colour, before the whole is set to level_db: (pitch_hz, level_db per Hz)
    hush_colour = [(25, -33), (63, -27), (200, -15.5), (370, -8.5), (470, -15), (760, -2), (1000, -10.5),
                   (2650, -3), (3230, -12.5), (10500, -20)]
    frames, hz = N // 256 + 5, np.fft.rfftfreq(1024, 1 / SR)
    patches = rng.standard_normal((frames, 513)).T
    patches = evened(uniform_filter1d(uniform_filter1d(patches, 8, 0), 14, 1))
    # slow random level changes, deepest below 250 Hz
    low_changes = 3 * evened(uniform_filter1d(patches[0], 6))
    patches = patches + low_changes / (1 + (hz[:, None] / 250) ** 2)
    z = pair(read(hush_same, hz), frames) * volts_from_db(read(hush_colour, hz)[:, None] + patchy_db * patches)
    noise = signal.istft(z, nperseg=1024, noverlap=768)[1][:, :N]
    return volts_from_db(level_db) * noise / np.std(noise.mean(0))


def electric_whine(hz=8770, width_hz=25, level_db=-90.5):
    """A faint, high electric whine: one very narrow band of noise."""
    return volts_from_db(level_db) * fuzzy_tone(hz, width_hz)


def scene():
    """Bag, its echo, the sliding cable and the quiet background."""
    bag = snaps() + crackle() + slides()
    echo = volts_from_db(-7) * room(bag)
    cable = rubbing() + squeak()
    return bag + echo + cable + hush() + electric_whine()


def low_pass(x):
    """Removes everything above the highest recorded frequency."""
    return signal.sosfilt(signal.butter(12, 12270, fs=SR, output="sos"), x)


def record(dry):
    """A steep filter takes away the highest treble."""
    # band limit: (pitch_hz, gain_db)
    edge = [(10990, 0), (11070, -17), (11450, -34), (12300, -55)]
    taps = np.roll(irfft(volts_from_db(read(edge, HZ))), SIZE // 2) * signal.windows.hann(SIZE, sym=False)
    limited = signal.oaconvolve(dry, taps[None], axes=1)[:, SIZE // 2:][:, :N]
    return low_pass(limited)


dry = scene()
out = record(dry)
wav_record(out)
```